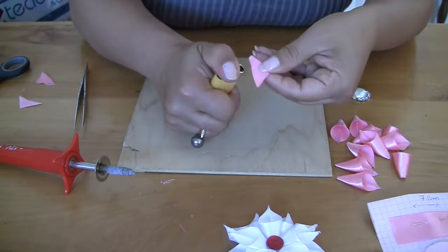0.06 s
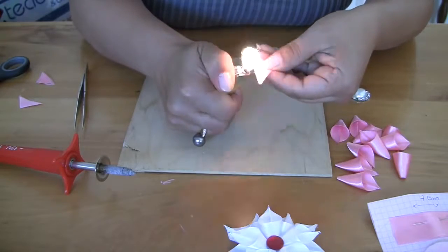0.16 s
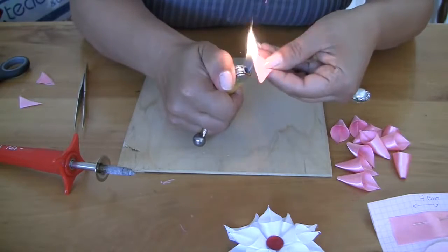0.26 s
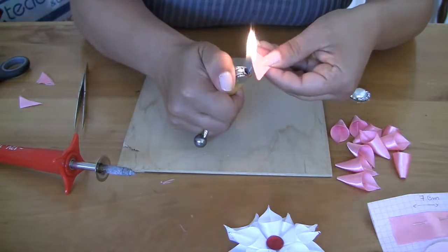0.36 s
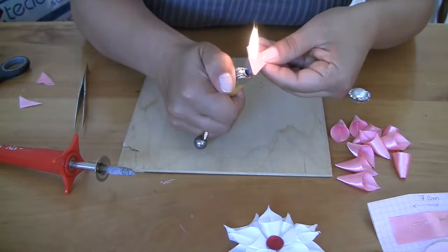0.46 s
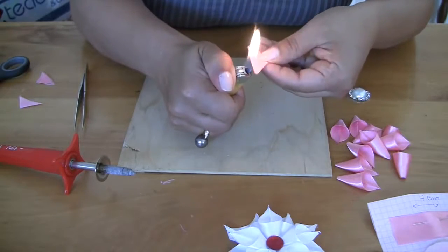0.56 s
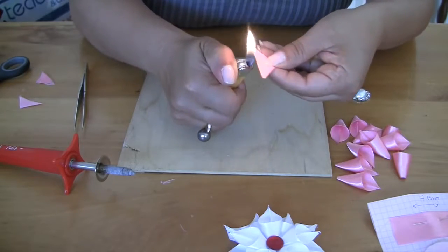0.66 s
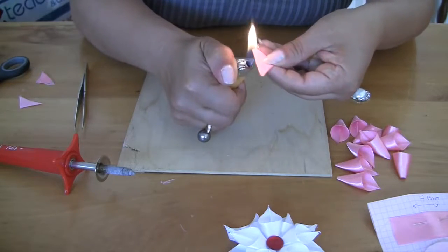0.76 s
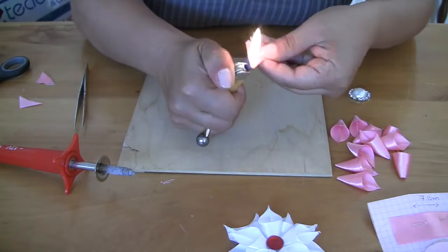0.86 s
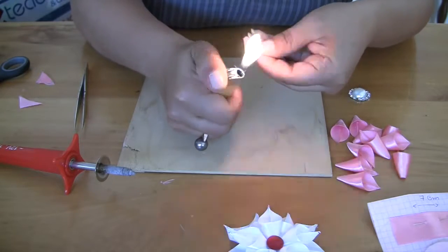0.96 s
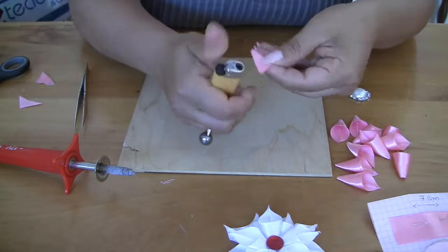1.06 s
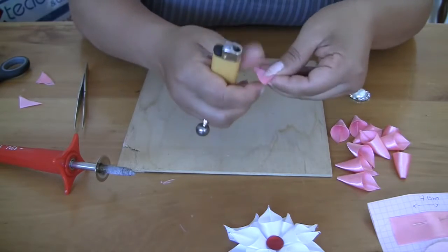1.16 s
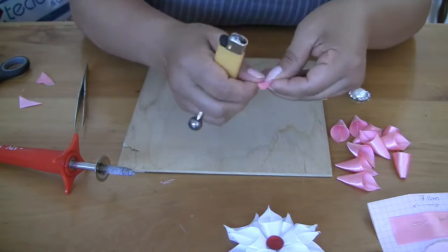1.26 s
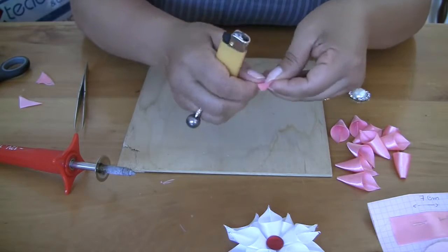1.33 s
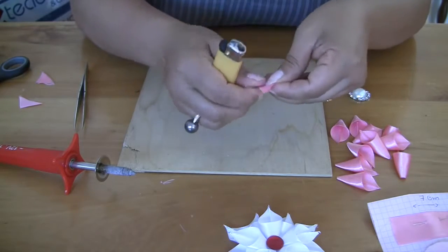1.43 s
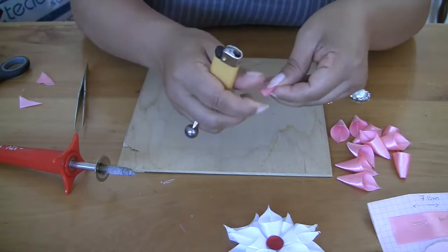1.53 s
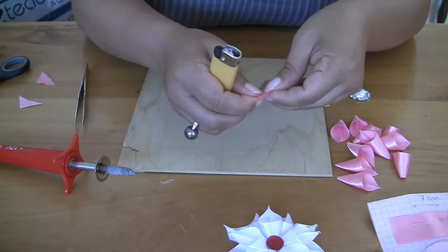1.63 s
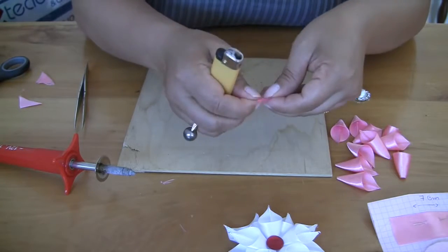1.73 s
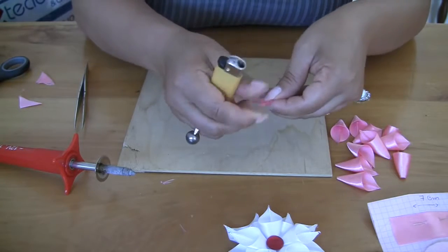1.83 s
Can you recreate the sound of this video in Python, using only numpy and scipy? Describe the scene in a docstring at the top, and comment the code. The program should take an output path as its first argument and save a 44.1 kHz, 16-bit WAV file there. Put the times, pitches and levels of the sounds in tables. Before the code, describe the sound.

Close stereo microphones in a small hard room catch a single lighter strike, a gritty scrape bursting into a loud metallic click, then quiet fluttering gas until the lever releases with small ticks, over steady room noise.

```python
"""Striking a disposable lighter

A disposable lighter is struck once over a wooden table in a small, hard room. Knocks are impulses ringing hood,
body and long room modes; the flint is dense random snaps; the gas jet is noise through resonances. Fingers on
wheel, lever and ribbon are short noise bands and decaying sines. Random-phase echoes form the room, over
slightly wavering noise and a low, steady hum."""
import sys
import numpy as np
from scipy import signal
from scipy.fft import rfft, irfft
from scipy.io import wavfile

SR = 44100
rng = np.random.default_rng(int(sys.argv[2]) if len(sys.argv) > 2 else 0)


def waveform_to_disk(signal):
    """Save audio, clipped to [-1, 1], as 16-bit WAV at the path in sys.argv[1]."""
    frames = np.transpose(np.atleast_2d(signal))
    scaled = np.clip(frames, -1, 1) * 32767
    samples = np.round(scaled).astype(np.int16)
    wavfile.write(sys.argv[1], SR, samples)


N = 83790

# thumb, wheel and fingers knocking the lighter: start_s, level_db, dull_above_hz, left_minus_right_db
KNOCKS = [(0.2238, -14.5, 1590, -3.5), (0.2278, -9, 4460, -2), (0.2290, -8, 6700, -3.5),
          (0.2388, -12, 18000, -2), (0.24055, -9, 19000, 2), (0.2410, -9, 19000, -1),
          (0.2420, 5.5, 26000, -1), (1.0708, -30, 9000, 3.5), (1.0751, -34, 13000, 2),
          (1.3075, -37, 2800, 3)]
# colour of a bare knock: frequency_hz, level_db
KNOCK_COLOUR = [(40, -36), (110, -17), (220, -5), (420, -7.5), (800, -1.5), (1250, -5.5), (1600, 4),
                (2050, -5), (2550, 5), (3300, 5), (4500, -0.5), (5600, -2), (6600, -2.5), (8800, 3),
                (10900, -7), (12400, 2), (13800, -11.5), (16000, -14)]
# ringing of the metal hood and wheel: pitch_hz, level_over_bare_knock_db, t60_s
HOOD_MODES = [(1427, 1, 0.058), (3384, 7, 0.1), (4150, -2, 0.052), (4745, 4, 0.079), (5500, 4, .2),
              (6190, 5, 0.13), (6950, 9, 0.11), (7600, -3, 0.0091), (8700, -2, .017), (9570, -1, .1)]
# low ringing of the lighter's body, with long room modes near 131 and 224 Hz:
# pitch_hz, level_over_bare_knock_db, t60_s
LOW_MODES = [(131, 6, 0.27), (183, -2, .25), (224, -3.5, .4), (261, 2.5, .035), (680, -10, 0.014),
             (773, -13, 0.035)]
# delay of the table bounce to each microphone: left_s, right_s
BOUNCE_DELAYS = (0.000183, 0.000316)
BOUNCE_DB = -7.5

# wheel grinding on the flint: time_s, level_db, brightness_0_to_1
GRIND = [(0.213, -54, 0.05), (0.218, -35.5, 0.04), (0.227, -36.5, 0.13), (0.23, -34.5, 0.1),
         (0.237, -29, 0.8), (0.2415, -20.5, 0.99), (0.246, -30.5, 0.9), (0.252, -54, 1)]
# colour of the slow wheel: frequency_hz, relative_level_db
GRIND_SLOW_COLOUR = [(30, -45), (90, -24), (250, 1), (450, -4.5), (900, 3), (1700, -9), (2700, 5.5),
                     (4500, 3.5), (6700, 4), (8500, -14), (15000, -28)]
# colour of the biting wheel: frequency_hz, relative_level_db
GRIND_FAST_COLOUR = [(60, -30), (250, -27), (1700, -2.5), (2800, 6), (3800, 4.5), (4800, -1), (5900, -1),
                     (7100, 7.5), (8100, 0), (9200, 0.5), (10800, -2.5), (12500, -5.5), (15000, -18)]
# mean rate of the random snaps; scale of their level spread; noise level relative to the snaps
TEETH_PER_S, TOOTH_SPREAD_DB, GRIT_GAIN = 3700, 4.5, 0.96

# resonances of nozzle and hood: centre_hz, width_hz, relative_level_db
JET_MODES = [(1927, 180, -11.5), (2526, 390, -0.5), (2817, 350, -2.5), (3390, 280, -10.5)]
# plain rush of gas: frequency_hz, relative_level_db
RUSH_COLOUR = [(200, -31), (900, 4), (2500, -8), (3600, 0.5), (4300, -3), (5300, -5.5), (8000, -13),
               (15000, -28)]
RUSH_DB = -9  # relative to the resonances
# gas hiss before the trim: time_s, level_db
GAS_LEVEL = [(0.26, -61), (0.35, -51), (0.42, -55), (0.56, -54), (0.63, -55), (0.70, -53), (0.8, -57.5),
             (0.86, -54), (0.92, -57), (0.97, -55), (1.05, -57)]
# sputters of the flame: centre_s, swell_db
SPURTS = [(0.351, 6), (0.490, 8.5), (0.553, 0), (0.578, 6), (0.754, 4), (0.774, 4), (0.863, 3.5),
          (0.960, 3)]
SPURT_S = 0.0059  # from the centre to 1/e of the swell in dB
GAS_ON_S, GAS_RISE_S, GAS_OFF_S, GAS_SHUT_S = 0.17, 0.051, 1.057, 0.026
GAS_TRIM_DB, FLUTTER_DB, FLUTTER_HZ = 0.5, 0.83, 60
JET_DRIFT_HZ, JET_DRIFT_RATE_HZ, JET_SWELL_DB, JET_SWELL_RATE_HZ = 35.02, 25.06, 1.0, 25  # rms, rate

# lever springing back and a fingernail: start_s, level_db, pitch_hz, t60_s, left_minus_right_db
TICKS = [(1.0626, -44, 3420, 0.0092, -3), (1.0705, -37, 5900, .004, 3), (1.0714, -46, 3900, .005, 1.5),
         (1.0749, -39.5, 8900, .0018, 1), (1.0754, -42, 2650, .006, 0), (1.3072, -49, 1490, .008, 2),
         (1.308, -49, 2250, .007, 1)]
TICK_RISE_S = 0.0002
# skin on wheel, lever and ribbon: centre_s, length_s, level_before_grain_db, centre_hz, width_hz
BRUSHES = [(0.19, 0.009, -54, 6400, 2200), (0.216, 0.028, -60.5, 6700, 4000),
           (0.18, 0.046, -60.5, 2100, 2000), (1.065, 0.017, -60.5, 5500, 3000),
           (1.066, 0.009, -60, 3300, 900), (1.316, 0.017, -66.5, 1500, 730), (1.318, 0.024, -67, 2260, 500),
           (1.312, 0.04, -70, 7600, 2500)]

# decay of the reverberation: frequency_hz, t60_s
TAIL_DECAY = [(150, 0.94), (400, 0.6), (1000, 0.66), (2800, 0.6), (4500, 0.66), (5500, 0.64), (7000, 0.56),
              (9000, .5), (14000, 0.37)]
# colour of the reverberation: frequency_hz, relative_level_db
TAIL_COLOUR = [(30, -22), (80, -4), (125, 3), (260, 4.5), (450, 1.5), (1000, -1), (1600, 0.5), (2200, 0.5),
               (3000, -4), (4500, 4.5), (5500, 4), (7000, -2), (9000, -4.5), (10800, 5), (12300, 0.5),
               (13500, -10), (15000, -31)]
# left-right likeness of the reverberation: frequency_hz, likeness_0_to_1
ECHO_LIKENESS = [(60, .5), (150, 0.82), (700, 0.76), (1300, 0.46), (2500, 0.12), (15000, 0)]
# colour of the quick scatter: frequency_hz, relative_level_db
EARLY_COLOUR = [(40, -18), (200, -6), (1000, 3), (4000, 4.5), (11000, -1), (13000, 4), (16000, -12)]
TAIL_DB, EARLY_DB = -6, -9
EARLY_T60_S, EARLY_MIN_LIKENESS, FIRST_ECHO_S = 0.11, 0.18, 0.001

# colour of the room noise: frequency_hz, relative_level_db_per_hz
AIR_COLOUR = [(25, -30), (50, -22), (80, -18), (125, -8), (175, -7), (225, -2), (300, -5), (450, -9),
              (650, -10), (900, -15), (1400, -18), (2300, -18.5), (3000, -22), (6200, -26), (10000, -31),
              (14000, -35), (15500, -46)]
# left-right likeness of the room noise: frequency_hz, likeness_0_to_1
AIR_LIKENESS = [(60, 0.083), (200, 0.36), (400, 0.31), (700, 0.21), (1500, 0.21), (5000, 0.17),
                (15000, 0.18)]
AIR_DB = -53
EDGE_HZ = 15780  # upper band limit

FREQUENCIES = np.fft.rfftfreq(N, 1 / SR)
TIME = np.arange(N) / SR


def clicks():
    """Modal impact: each knock is a minimum-phase impulse exciting modes of hood, body and room."""
    colour = amp(read(KNOCK_COLOUR, abs(np.fft.fftfreq(N, 1 / SR))))
    # minimum phase follows from the Hilbert transform of the log spectrum
    tick = np.fft.ifft(np.exp(np.conj(signal.hilbert(np.log(colour))))).real
    ring = sum(amp(db) / (1 + 2j * np.pi * (FREQUENCIES - pitch) * t60 / np.log(1000))
               for pitch, db, t60 in HOOD_MODES + LOW_MODES)
    knock = rfft(tick) * (1 + ring)
    out = np.zeros((2, N))
    for start, db, dull_hz, pan_db in KNOCKS:
        ratio = FREQUENCIES / dull_hz
        low_pass = 1 / (1 + np.sqrt(2) * 1j * ratio - ratio ** 2) ** 2
        click = irfft(knock * low_pass, N)
        unit_click = -click / np.linalg.norm(click)
        add(out, start, unit_click * pan_gains(db, pan_db))
    return out


def wheel():
    """Stick-slip friction: teeth chip the flint in random snaps, brighter as the wheel speeds up."""
    s, db, bright = np.transpose(GRIND)
    hits = (rng.random(N) < TEETH_PER_S / SR) * rng.choice([-1, 1], N)
    chips = hits * amp(TOOTH_SPREAD_DB * np.minimum(rng.exponential(1, N), 2))
    drive = evened(chips) + GRIT_GAIN * pair(0)
    bright = np.clip(np.interp(TIME, s, bright), 0, 1)
    slow = coloured(drive, GRIND_SLOW_COLOUR)
    fast = coloured(drive[:, ::-1], GRIND_FAST_COLOUR)  # time-reversed
    rasp = np.sqrt(1 - bright) * slow + np.sqrt(bright) * fast  # equal-power crossfade
    return rasp * amp(np.interp(TIME, s, db)) * (TIME > s[0]) * (TIME < s[-1])


def flame():
    """Turbulent jet: gas noise excites the nozzle's resonances, with flutter and sputter, until shut."""
    jet = sum(amp(db) * unsteady(resonate(pair(same=0.96), hz, width)) for hz, width, db in JET_MODES)
    rush = amp(RUSH_DB) * coloured(pair(same=0.7), RUSH_COLOUR)
    opening = np.clip((TIME - GAS_ON_S) / GAS_RISE_S, 0, 1)
    closing = np.clip(1 - (TIME - GAS_OFF_S) / GAS_SHUT_S, 0, 1)
    spurts = sum(db * np.exp(-((TIME - s) / SPURT_S) ** 2) for s, db in SPURTS)
    flutter = FLUTTER_DB * wander(FLUTTER_HZ)
    level_db = GAS_TRIM_DB + np.interp(TIME, *np.transpose(GAS_LEVEL)) + spurts + flutter
    return evened(jet + rush) * opening * closing * amp(level_db)


def unsteady(x):
    """Random modulation: a jet resonance drifts in frequency and swells in level."""
    drift_hz = JET_DRIFT_HZ * wander(JET_DRIFT_RATE_HZ)
    rotation = np.exp(2j * np.pi * np.cumsum(drift_hz) / SR)
    return (signal.hilbert(x) * rotation).real * amp(JET_SWELL_DB * wander(JET_SWELL_RATE_HZ))


def ticks():
    """Damped oscillation: a light touch rings one small part for a few milliseconds."""
    t, out = np.arange(SR // 10) / SR, np.zeros((2, N))
    for start, db, hz, t60, pan_db in TICKS:
        envelope = (1 - np.exp(-t / TICK_RISE_S)) * np.exp(-np.log(1000) * t / t60)
        add(out, start, envelope * np.sin(2 * np.pi * hz * t) * pan_gains(db, pan_db))
    return out


def fingers(grain_db=3.5, grain_hz=250):
    """Skin friction: brushes are short noise bands whose grain is random level modulation."""
    out = np.zeros((2, N))
    for centre, length, db, hz, width in BRUSHES:
        stroke = np.exp(-2 * ((TIME - centre) / length) ** 2)
        grainy_gain = amp(db + grain_db * wander(grain_hz))
        out += resonate(pair(same=0.8), hz, width) * stroke * grainy_gain
    return out


def table(x):
    """Specular reflection: the first bounce off the table top, a fraction of a millisecond late."""
    delay = np.exp(-2j * np.pi * FREQUENCIES * np.array(BOUNCE_DELAYS)[:, None])
    return amp(BOUNCE_DB) * irfft(rfft(x) * delay, N)


def room(x, size=256):
    """Diffuse reverberation: quick scatter from table and hands, then a tail decaying by frequency."""
    same = read(ECHO_LIKENESS, FREQUENCIES)
    hz, when, z = signal.stft(coloured(pair(same), TAIL_COLOUR), SR, nperseg=size)
    decay = np.exp(-np.log(1000) * when / read(TAIL_DECAY, hz)[:, None])
    tail = signal.istft(z * decay, SR, nperseg=size)[1][:, :N]
    scatter = coloured(pair(np.maximum(same, EARLY_MIN_LIKENESS)), EARLY_COLOUR)
    early = scatter * np.exp(-np.log(1000) * TIME / EARLY_T60_S)
    parts = [(TAIL_DB, tail), (EARLY_DB, early)]
    echo = sum(amp(db) * evened(part * (TIME > FIRST_ECHO_S)) for db, part in parts)
    echo = echo / np.sqrt(N)  # from rms to energy
    return x + signal.fftconvolve(x, echo, axes=1)[:, :N]


def air(waver_db=0.33, waver_hz=12, hum_hz=222, hum_width=70, hum_db=-69):
    """Stationary noise: a coloured room tone that wavers slightly in level, and a steady narrow band as a low
    hum."""
    noise = amp(AIR_DB) * coloured(pair(read(AIR_LIKENESS, FREQUENCIES)), AIR_COLOUR)
    hum = amp(hum_db) * resonate(pair(same=0.98), hum_hz, hum_width)
    return noise * amp(waver_db * wander(waver_hz)) + hum


def amp(db):
    """Logarithmic level: decibels to amplitude gain."""
    return 10 ** (np.asarray(db) / 20)


def pan_gains(db, pan_db):
    """Interaural level difference: left and right gains, split evenly about a level."""
    return amp([[db + pan_db / 2], [db - pan_db / 2]])


def evened(x):
    """Power normalisation: scales to rms 1."""
    return x / np.sqrt(np.mean(x ** 2) + 1e-20)


def read(points, hz):
    """Log-frequency interpolation: reads a curve at given frequencies."""
    f, value = np.transpose(points)
    return np.interp(np.log(hz + 1), np.log(f + 1), value)


def add(mix, s, sound):
    """Superposition: mixes a stereo sound in at a time in seconds."""
    part = mix[:, max(round(s * SR), 0):][:, :sound.shape[1]]
    part += sound[:, :part.shape[1]]


def coloured(x, points):
    """Linear filtering: weights a signal's spectrum, at rms 1."""
    return evened(irfft(rfft(x) * amp(read(points, FREQUENCIES)), N))


def pair(same):
    """Partial coherence: white noise at two microphones, partly alike."""
    a, b = rfft(rng.standard_normal((2, N)))
    same = np.clip(same, 0, 1)
    return irfft(np.array([a, same * a + np.sqrt(1 - same ** 2) * b]), N)


def resonate(x, hz, width):
    """Cascaded resonance: a double pole around a centre frequency, at rms 1."""
    response = 1 / (1 + 2j * (FREQUENCIES - hz) / width) ** 2
    return evened(irfft(rfft(x) * response, N))


def wander(rate_hz):
    """Low-passed noise: a slow random curve, at rms 1."""
    return evened(irfft(rfft(rng.standard_normal(N)) / (1 + (FREQUENCIES / rate_hz) ** 2), N))


def scene():
    """Superposition: lighter and hands excite the room, over the table bounce and room noise."""
    knocks = clicks()
    sources = knocks + ticks() + wheel() + flame() + fingers()
    return room(sources) + table(knocks) + air()


def record(dry):
    """Band limitation: a steep linear-phase low-pass."""
    low_pass = signal.firwin(511, EDGE_HZ, window=("kaiser", 9), fs=SR)
    return signal.oaconvolve(dry, low_pass[None], "same")


dry = scene()
out = record(dry)
waveform_to_disk(out)
```